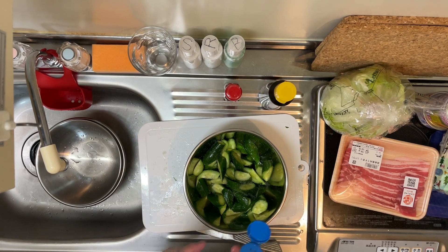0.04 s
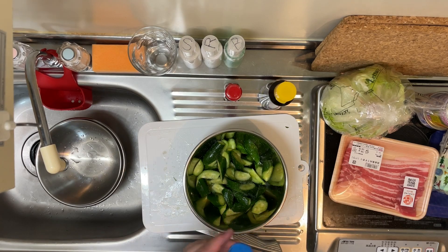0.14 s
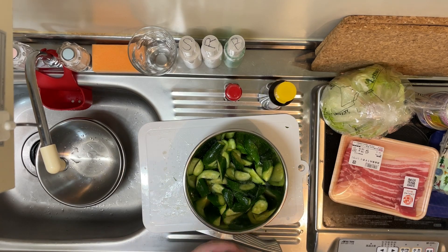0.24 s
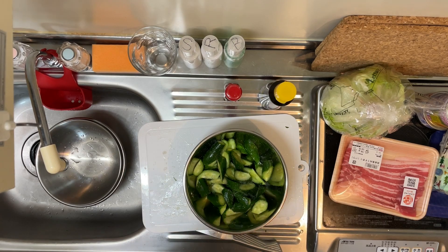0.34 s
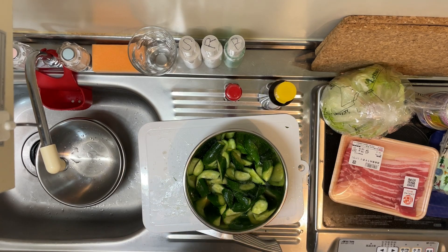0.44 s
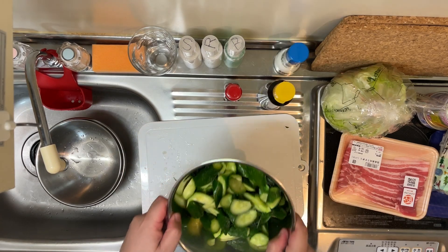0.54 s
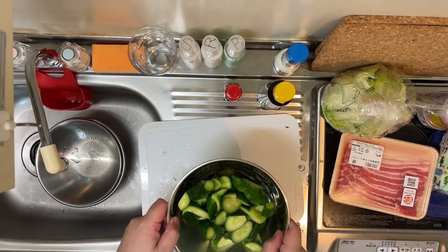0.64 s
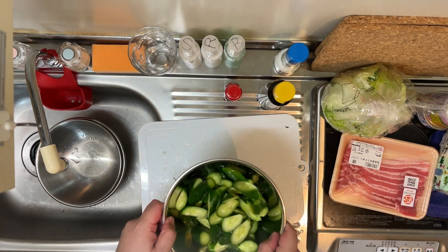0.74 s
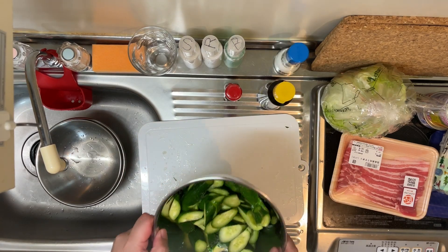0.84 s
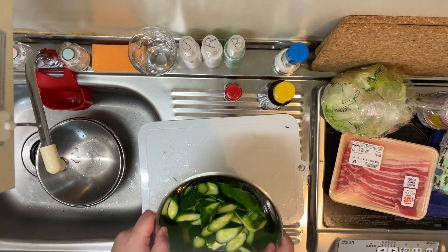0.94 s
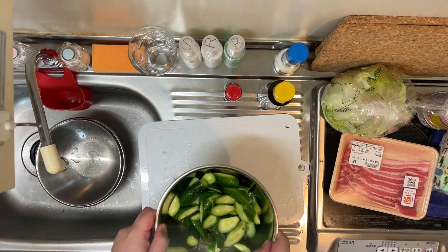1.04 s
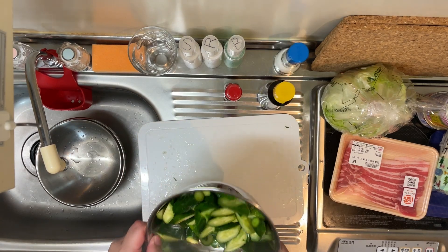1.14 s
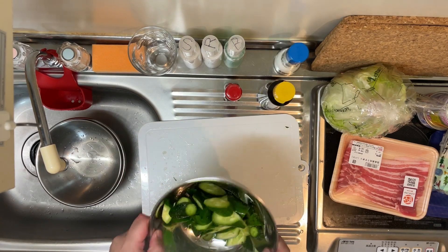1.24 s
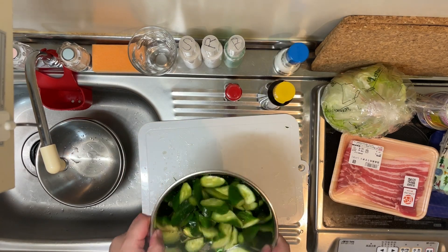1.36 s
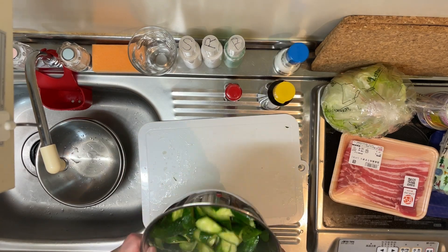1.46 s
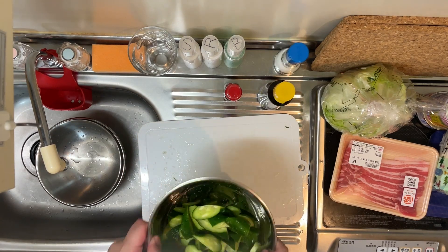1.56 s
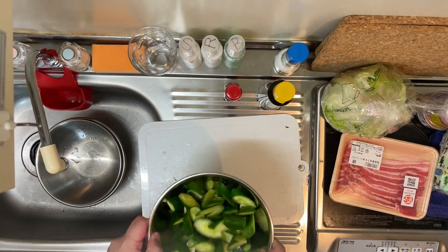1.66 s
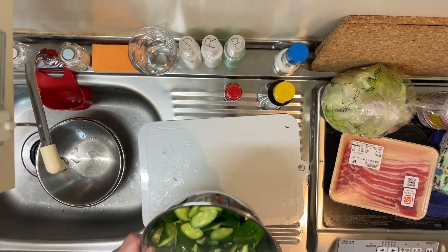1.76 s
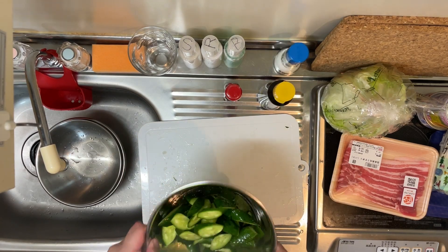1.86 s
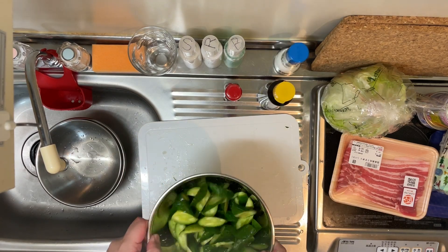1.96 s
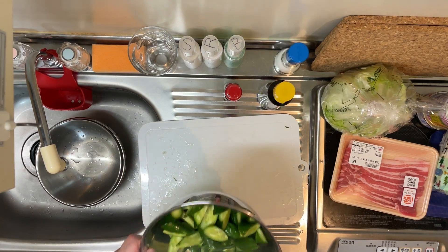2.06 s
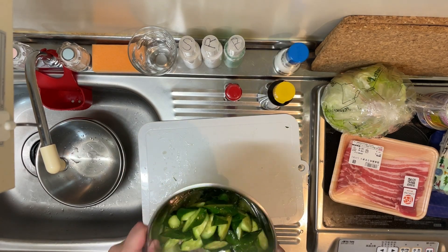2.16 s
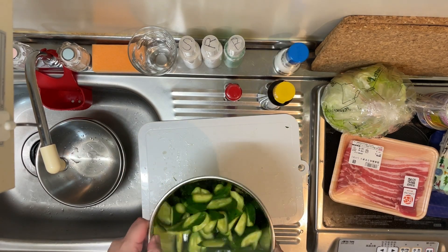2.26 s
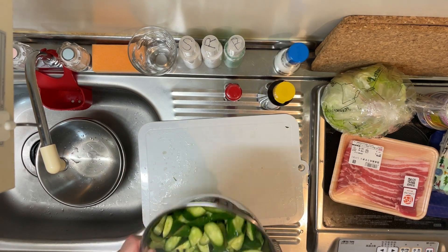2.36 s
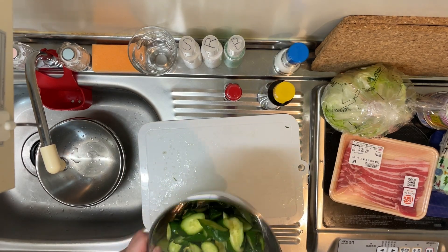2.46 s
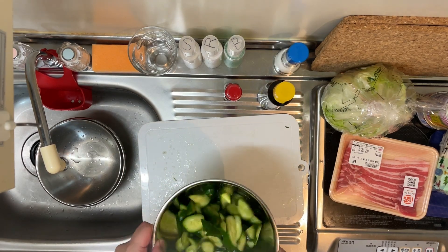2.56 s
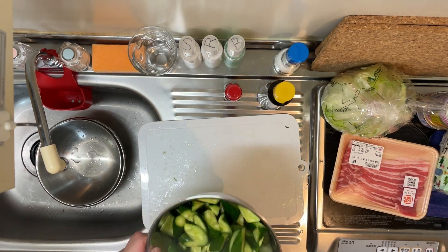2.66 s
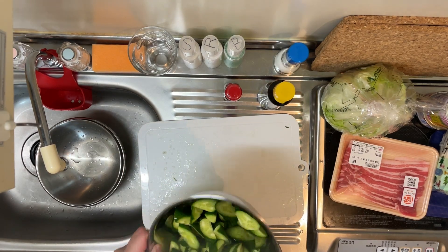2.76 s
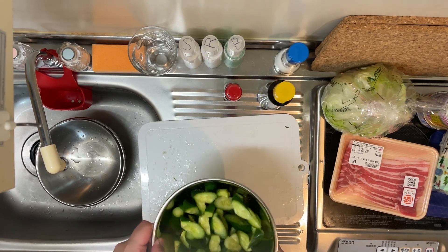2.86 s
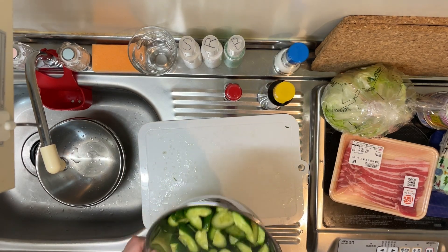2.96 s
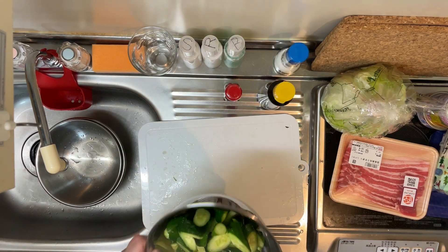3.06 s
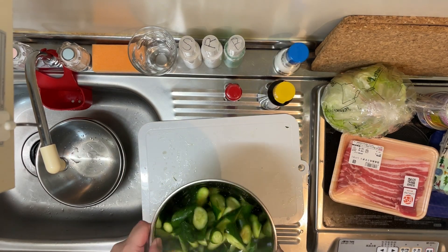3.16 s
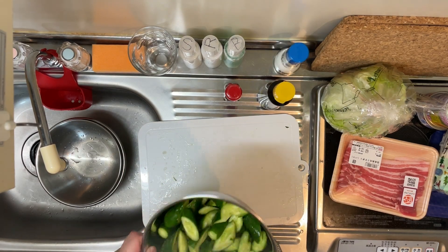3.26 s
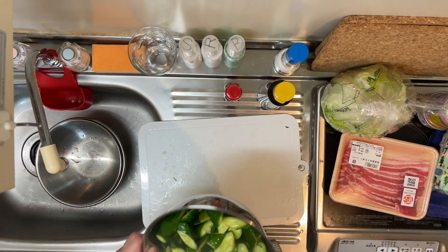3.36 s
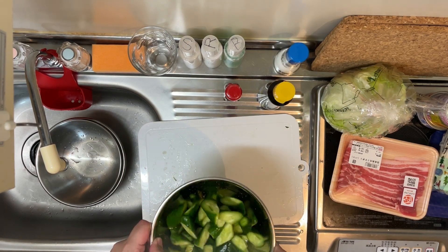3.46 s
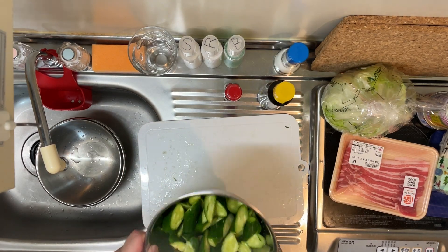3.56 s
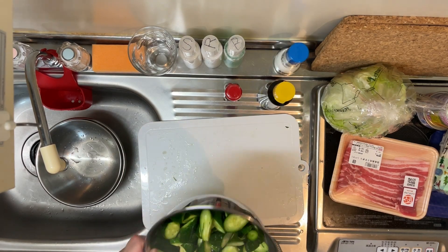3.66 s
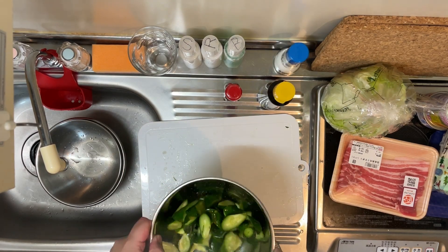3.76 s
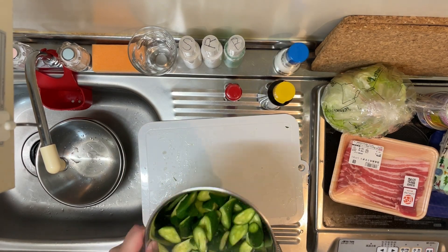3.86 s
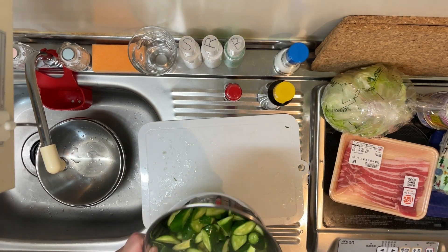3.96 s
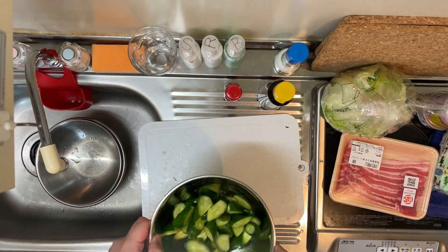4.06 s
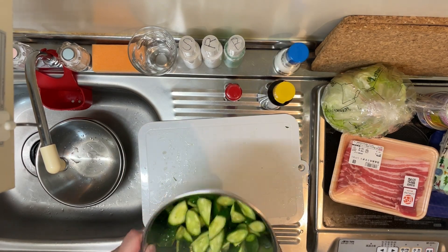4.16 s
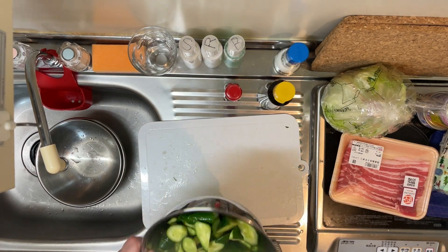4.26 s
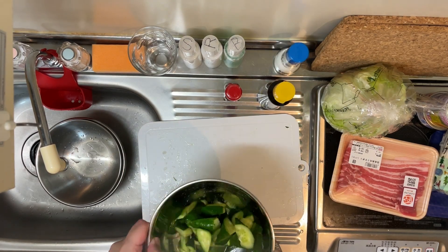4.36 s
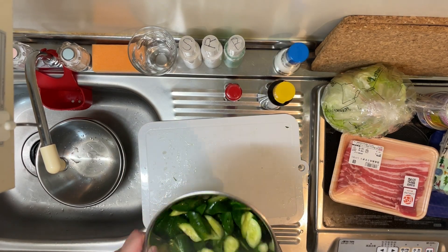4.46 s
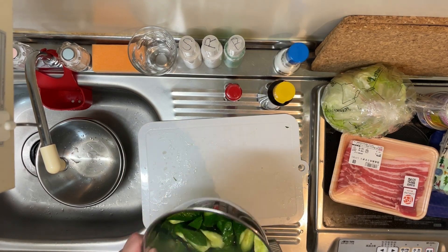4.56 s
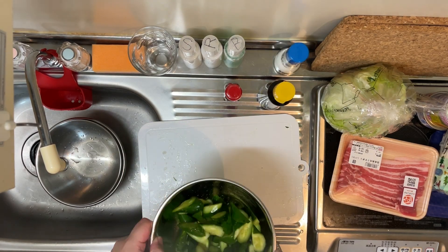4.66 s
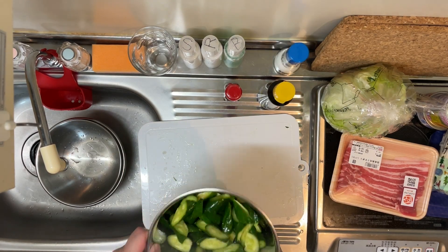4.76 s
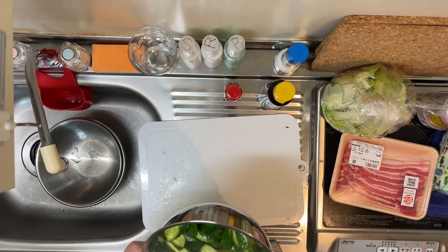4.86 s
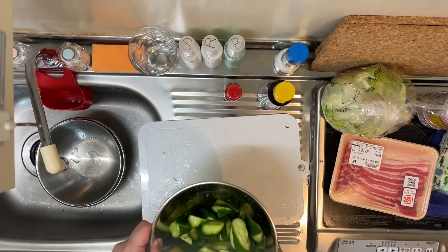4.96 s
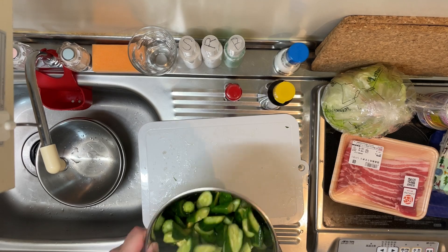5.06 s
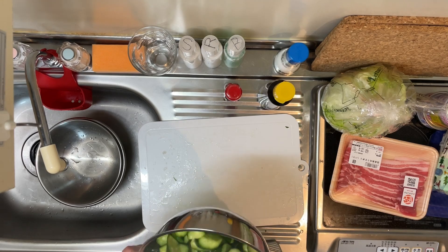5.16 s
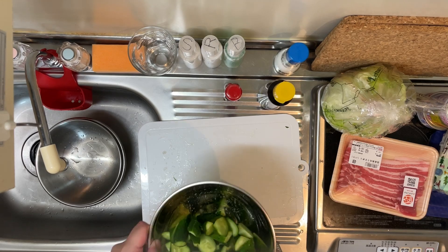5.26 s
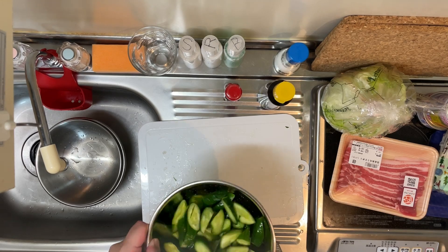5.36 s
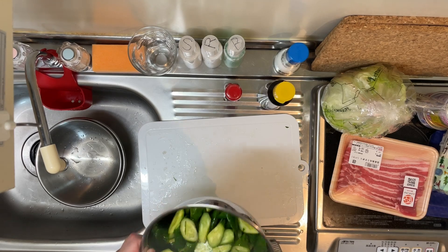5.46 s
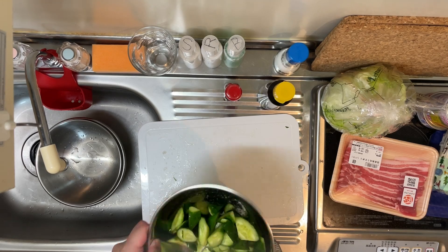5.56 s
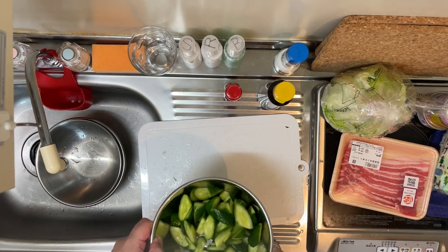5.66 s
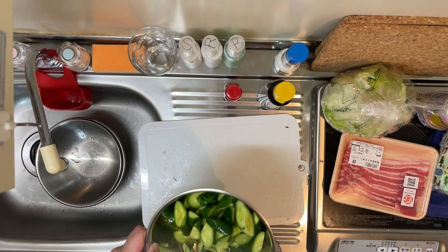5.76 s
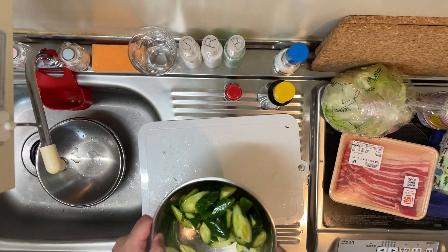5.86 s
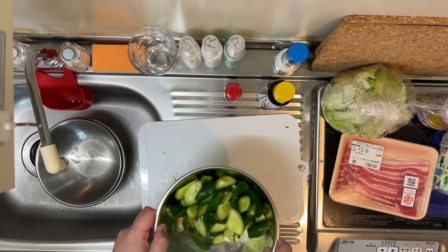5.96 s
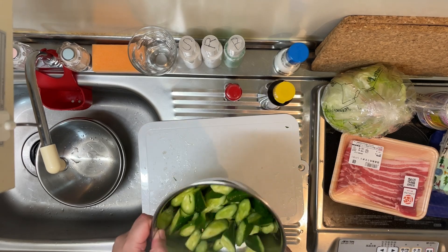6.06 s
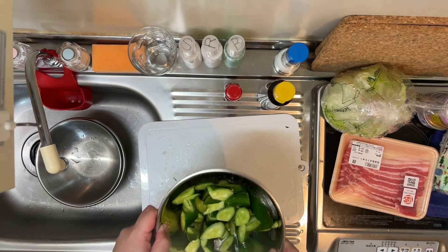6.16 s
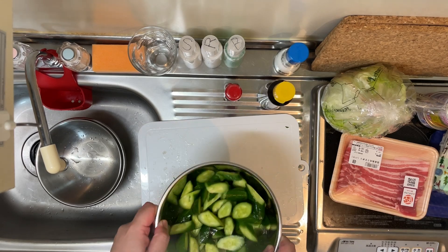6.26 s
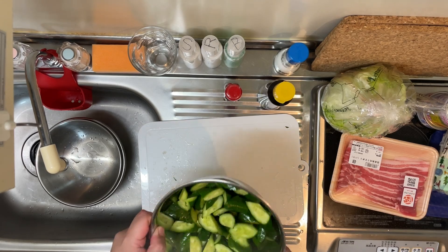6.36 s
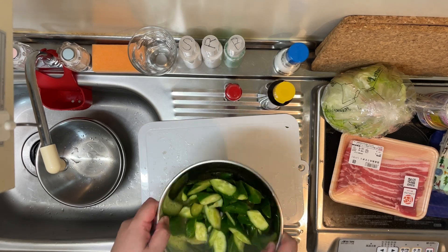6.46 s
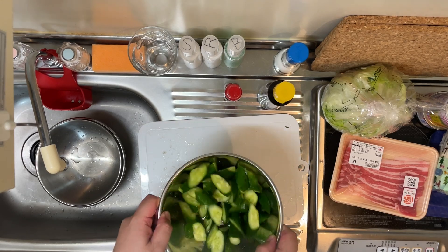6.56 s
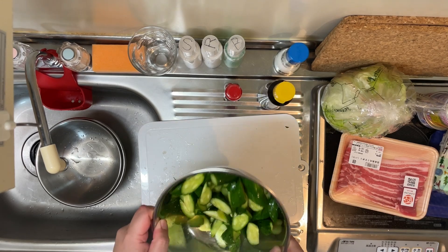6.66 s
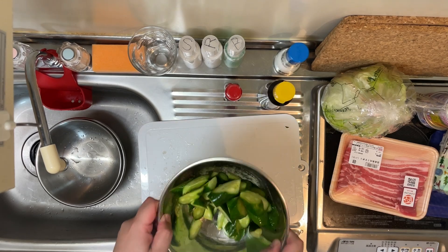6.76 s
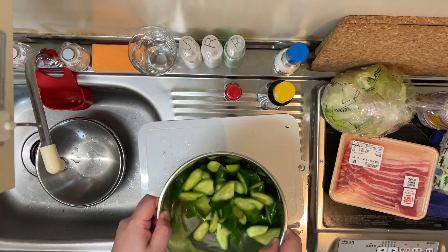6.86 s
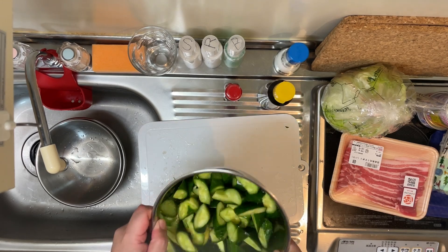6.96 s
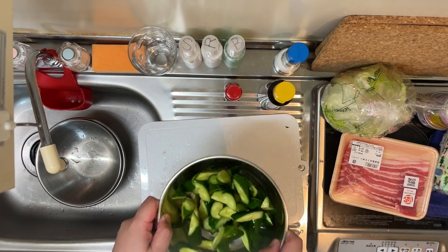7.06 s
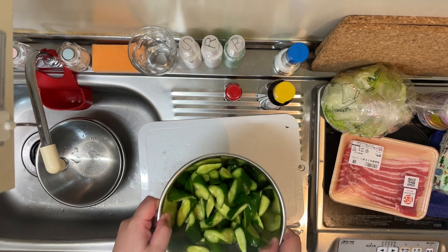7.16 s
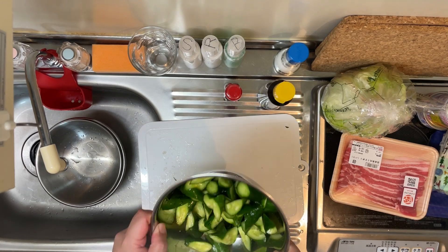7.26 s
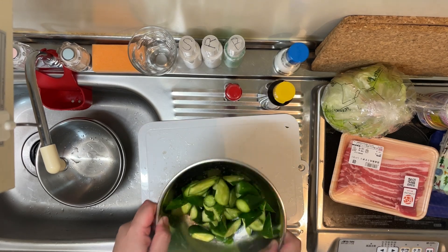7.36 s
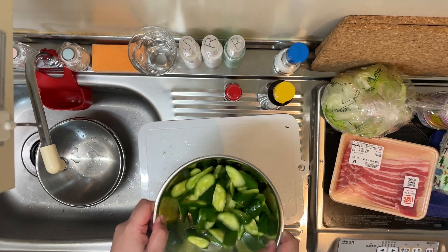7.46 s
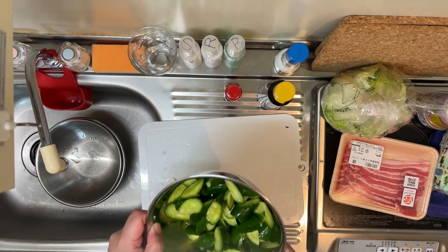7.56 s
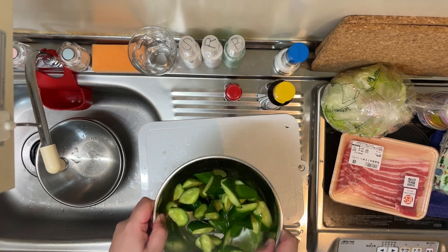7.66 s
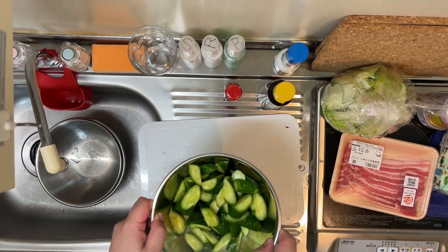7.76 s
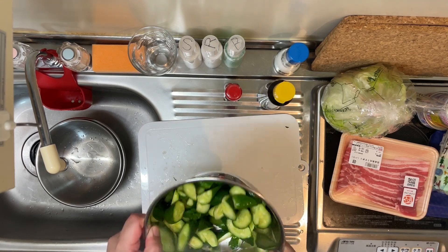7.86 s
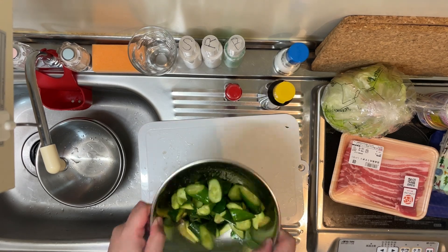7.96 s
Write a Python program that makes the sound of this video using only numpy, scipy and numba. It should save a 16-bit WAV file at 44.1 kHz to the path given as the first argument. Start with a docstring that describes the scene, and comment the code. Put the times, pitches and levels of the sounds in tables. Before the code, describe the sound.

A bottle is set down on a steel counter, then wet cut vegetables are tossed rapidly in a metal bowl over a low fan hum.

```python
"""A fan hums throughout, as shaped noise plus one narrow resonance; stray drops tick as faint noise puffs.
A sleeve rustles (treble noise), then a bottle is set on a steel counter: damped modes and a noise crack.
Then wet cut vegetables are tossed in a hand-held steel bowl about three times a second: each toss lands
as a cluster of dull knocks (damped modes of hollow, grip and wall) with wet slaps (banded noise puffs).
A small kitchen answers through feedback delays."""
import sys
import numpy as np
from scipy import signal
from scipy.fft import rfft, irfft, next_fast_len
from scipy.io import wavfile
from numba import njit

SR = 44100
rng = np.random.default_rng(int(sys.argv[2]) if len(sys.argv) > 2 else 0)


def decibels_to_gain(level_db):
    """Convert a level in decibels to a linear amplitude gain (20 dB per decade)."""
    exponent = np.asarray(level_db, float) / 20
    return 10 ** exponent


def transcribe(signal):
    """Save signal, clipped to [-1, 1], as a 16-bit WAV file at the path in sys.argv[1]."""
    frames = np.atleast_2d(signal).T
    limited = np.clip(frames, -1, 1)
    pcm = np.round(limited * 32767).astype(np.int16)
    wavfile.write(sys.argv[1], SR, pcm)


N = 353241

# fan noise spectrum: f/Hz, relative density/dB per Hz
FAN_SPECTRUM = [(30, -29), (74, 0.5), (240, -2.5), (295, 1), (400, -11), (1790, -19.5), (2900, -28.5),
                (3250, -25.5), (4870, -42.5), (16000, -52.5)]
# sleeve brushing past: t/s, level/dB
RUSTLE_LEVEL = [(0.0, -78), (0.058, -56.5), (0.3, -100)]
# bottle on the counter, heel then flat: t/s, thud level/dB, crack level/dB
BOTTLE_HITS = [(.313, -15, -34), (0.3386, -43, -17)]
# counter modes: f/Hz, relative level/dB, nominal t60/s
COUNTER_MODES = [(185, -24, 0.092), (312, -4.5, 0.055), (760, -12, 0.02)]
# bottle crack spectrum: f/Hz, relative density/dB per Hz
CRACK_SPECTRUM = [(100, 0), (5770, -13), (7940, -7), (16000, -14.5)]
# tosses coming down: first piece t/s, thickest t/s, hollow pitch f/Hz (used relative to mean), splash level/dB
TOSS_LANDINGS = [(0.708, 0.75, 732, -40.5), (1.029, 1.046, 714, -33.5), (1.337, 1.36, 685, -36),
                 (1.643, 1.675, 689, -33), (1.932, 1.973, 651, -36.5), (2.24, 2.282, 683, -37.5),
                 (2.57, 2.6, 676, -33.5), (2.857, 2.884, 666, -39.5), (3.163, 3.211, 676, -38),
                 (3.475, 3.516, 665, -38), (3.771, 3.818, 672, -36.5), (4.1, 4.125, 671, -34.5),
                 (4.387, 4.428, 599, -35), (4.704, 4.725, 690, -36), (5.019, 5.053, 653, -34),
                 (5.331, 5.381, 645, -36), (5.633, 5.692, 672, -38), (5.929, 5.982, 673, -38),
                 (6.236, 6.278, 675, -37.5), (6.527, 6.579, 690, -39), (6.845, 6.885, 647, -35.5),
                 (7.127, 7.165, 637, -40.5), (7.423, 7.482, 690, -39), (7.733, 7.762, 692, -37.5)]
# heaviest pieces hitting the wall: t/s, hollow knock level/dB, steel ring level/dB
HEAVY_PIECES = [(0.7155, -5.5, -40.5), (0.729, -31, -32.5), (0.7512, -15.5, -54), (1.0289, -14.5, -40),
                (1.0623, -11.5, -41), (1.3293, -18.5, -33.5), (1.636, -21, -41), (1.6843, -12.5, -41),
                (1.9877, -25, -48), (2.0026, -14, -27.5), (2.2783, -20, -32), (2.2949, -23, -29),
                (2.6118, -12, -42), (2.859, -46, -42), (3.169, -22, -43), (3.2013, -24, -37.5),
                (3.4998, -20.5, -33.5), (3.5266, -15, -51), (3.8137, -39, -27), (3.8458, -23, -52),
                (4.4186, -25, -29), (4.7158, -8.5, -23.5), (5.034, -29, -34.5), (5.0509, -25.5, -19),
                (5.3381, -15, -33.5), (5.3592, -14.5, -30), (5.3681, -17.5, -38), (5.633, -25, -47.5),
                (5.6597, -18.5, -35), (5.967, -11.5, -54), (6.0006, -17.5, -38.5), (6.2412, -17, -61),
                (6.2602, -17, -38), (6.2925, -18, -36), (6.3039, -15, -33.5), (6.535, -21.5, -57),
                (6.5634, -17, -32), (6.6045, -16, -41), (6.829, -26.5, -48), (6.848, -34, -40),
                (6.8711, -15.5, -52), (6.8954, -20, -39), (6.937, -23.5, -52), (7.1445, -20.5, -27),
                (7.1718, -13, -38), (7.187, -22, -37.5), (7.443, -24, -33.5), (7.7383, -10.5, -36.5),
                (7.7478, -16, -35.5), (7.775, -13, -32.5)]
# wet faces and drops smacking the steel: t/s, level/dB
WET_SLAPS = [(0.761, -31), (1.0705, -21), (1.924, -24), (2.25, -23.5), (2.5474, -31), (2.6148, -16),
             (3.014, -37), (3.3673, -39.5), (3.514, -25), (3.833, -27), (4.0618, -32.5), (4.1212, -26),
             (4.378, -32), (4.566, -35.5), (5.006, -26), (5.687, -21), (5.78, -25), (5.881, -43),
             (5.921, -43), (6.151, -36), (6.329, -29), (6.869, -22), (6.944, -29), (6.985, -26),
             (7.225, -39), (7.911, -47)]
# soft slips along the lightly loaded bowl: t/s, level/dB
SOFT_SLIPS = [(.702, -24), (1.008, -24), (4.98, -28), (5.9, -30), (6.18, -35.5), (6.478, -27), (7.107, -29)]
# edges that catch one wall mode: t/s, mode f/Hz, level/dB
EDGE_CLANKS = [(.7205, 2324, -24), (.7512, 2250, -21.5), (1.361, 3150, -21), (5.0524, 3167, -28)]
# loaded bowl, hollow part that a soft push moves: nominal f/Hz, relative level/dB, nominal t60/s
HOLLOW_MODES = [(501, -6.5, 0.1), (581, 2.5, 0.038), (657.6, 5, 0.053), (705.8, 9, 0.037), (763, 8, 0.0071),
                (900, -12, 0.18), (1125, -6, 0.025)]
# bowl rocking in the hands: nominal f/Hz, relative level/dB, nominal t60/s
GRIP_MODES = [(184, -9, 0.084), (257.5, -1.5, 0.059), (299.7, -6, 0.079)]
# steel wall, rung by hard edges: nominal f/Hz, relative level/dB, nominal t60/s
STEEL_MODES = [(1488, -4, 0.027), (2379, 4.5, 0.019), (3150, 7.5, 0.043), (3947, 11.5, 0.0085),
               (4450, -5.5, 0.034), (5536, -6.5, 0.042), (7090, -7, 0.063)]
# wet noise spectrum: f/Hz, relative density/dB per Hz
SPLASH_SPECTRUM = [(1500, 2), (5500, -6.5), (8900, -3.5), (11000, -11)]

FAN_DB = -43.5
HUM_HZ, HUM_WIDTH_HZ, HUM_DB = 290.5, 22, -53.5   # fan housing
STRAY_DB, STRAY_GROWS_DB_PER_S = -75, 1.16
SLIDE_DB, SLIDE_GROWS_DB_PER_S = -48, 0.38
PING_DB, PING_FOLLOWS = -33.5, 0.43   # wall ring under a slap; share of slap level/dB
TUMBLE_DB, TUMBLE_FOLLOWS = -22.5, 0.36   # dull stream: mean; share of the splash's swing
TUMBLE_GROWS_DB_PER_S = 0.5
GRIP_DB, GRIP_FOLLOWS = -23, 0.38   # hands give: rocking follows the knock only in part
LOADED_RING = 0.4   # share of ring time left while a heavy piece rests on the wall
ROOM_T60_S, ROOM_DB, WALL_CUT_HZ = 0.2, -17, 2550
CUTOFF_HZ = 16100


def rms_one(x):
    """Scale to rms 1."""
    return x / np.sqrt(np.mean(x ** 2) + 1e-20)


def rms_one_gain(response):
    """Scale to mean power gain 1."""
    return response / np.sqrt(np.mean(np.abs(response) ** 2))


def colour(x, spectrum):
    """Minimum-phase filter with this spectrum, power gain 1: nothing sounds early."""
    size = next_fast_len(N + 8192)
    hz = np.maximum(np.arange(size // 2 + 1) * SR / size, 10)
    point_hz, point_db = np.transpose(spectrum)
    gain = decibels_to_gain(np.interp(np.log(hz), np.log(point_hz), point_db))
    # folded cepstrum gives minimum phase
    cepstrum = irfft(np.log(gain), size)
    cepstrum[1:size // 2] *= 2
    cepstrum[size // 2 + 1:] = 0
    response = rms_one_gain(np.exp(rfft(cepstrum)))
    return irfft(rfft(x, size) * response, size)[:N]


def spikes(times, sizes):
    """One-sample clicks at these times, on a negligible floor."""
    out = np.full(N, 1e-18)
    np.add.at(out, (np.asarray(times) * SR).astype(int), sizes)
    return out


def fade(x, t60):
    """Each spike leaves an exponential tail."""
    return signal.lfilter([1], [1, -decibels_to_gain(-60 / (t60 * SR))], x)


@njit
def add_rings(out, at, size, turn, keep, swell):
    """Damped sines (turn/rad, decay factor keep, both per sample); each swells while the contact lasts."""
    for i in range(len(at)):
        z, step, missing = size[i] + 0j, keep[i] * np.exp(1j * turn[i]), 1.0
        for n in range(at[i], min(len(out), at[i] + 6000)):
            z *= step
            missing *= swell
            out[n] += z.imag * (1 - missing)
            if z.real ** 2 + z.imag ** 2 < 1e-10:
                break
    return out


def strike(modes, times, level_db, spread_db, detune, contact_s, tuning=1, ring=1):
    """Each blow drives every mode with its own strength, detuning and damping."""
    hz, mode_db, t60_s = np.transpose(modes)
    draw = rng.standard_normal((len(times), 4, len(modes)))
    sign = np.sign(draw[:, 1] + 1.1)   # a minority start inverted
    size = decibels_to_gain(level_db[:, None] + mode_db + spread_db * draw[:, 0]) * sign
    turn = 2 * np.pi * hz * (np.reshape(tuning, (-1, 1)) + detune * draw[:, 2]) / SR
    ring_s = ring * t60_s * np.exp(0.68 * np.clip(draw[:, 3], -2, 1))
    keep = decibels_to_gain(-60 / (ring_s * SR))
    at = np.repeat((times * SR).astype(np.int64), len(modes))
    swell = np.exp(-1 / (contact_s * SR))
    return add_rings(np.zeros(N), at, size.ravel(), turn.ravel(), keep.ravel(), swell)


def toss_db(peak_db, edge_db, last_s, lead_s, tail_s):
    """Landing stream level: pieces slide in, thicken, thin out until last_s later and settle."""
    out, t = np.full(N, -120.), np.arange(N) / SR
    for (first, thickest, *_), top_db in zip(TOSS_LANDINGS, peak_db):
        thin = thickest + last_s
        corners = [first - lead_s, first, thickest, thin, thin + tail_s]
        out = np.maximum(out, top_db + np.interp(t, corners, [-60, edge_db, 0, edge_db, -60]))
    return out


def splash_db():
    """Level of the wet, bright part of each toss."""
    peak_db = np.transpose(TOSS_LANDINGS)[3]
    return toss_db(peak_db, edge_db=-12, last_s=0.045, lead_s=0.04, tail_s=0.15)


def tumble_db():
    """Level of the dull part of each toss: follows the splash in part and grows slowly."""
    s, _, _, wet_db = np.transpose(TOSS_LANDINGS)
    peak_db = TUMBLE_DB + TUMBLE_FOLLOWS * (wet_db - wet_db.mean())
    peak_db = peak_db + TUMBLE_GROWS_DB_PER_S * (s - s.mean())
    return toss_db(peak_db, edge_db=-8.5, last_s=0.027, lead_s=0.054, tail_s=0.18)


def load_tuning(times):
    """How the load lies in the nearest toss scales all hollow modes alike."""
    thickest, hollow_hz = np.transpose(TOSS_LANDINGS)[1:3]
    nearest = np.abs(times[:, None] - thickest).argmin(axis=1)
    return hollow_hz[nearest] / hollow_hz.mean()


def small_pieces(level_db, per_s, size_db):
    """Times and levels of lighter pieces, falling at random."""
    at = np.flatnonzero((rng.random(N) < per_s / SR) & (level_db > -88))
    return at / SR, level_db[at] + size_db * np.minimum(rng.exponential(1, N)[at], 2.5)


def fan():
    """Steady noise with the fan's spectrum."""
    return decibels_to_gain(FAN_DB) * rms_one(colour(rng.standard_normal(N), FAN_SPECTRUM))


def hum():
    """Noise twice through one narrow resonance of the fan housing."""
    b, a = signal.iirpeak(HUM_HZ, HUM_HZ / HUM_WIDTH_HZ, fs=SR)
    once = signal.lfilter(b, a, rng.standard_normal(N))
    return decibels_to_gain(HUM_DB) * rms_one(signal.lfilter(b, a, once))


def wet():
    """Noise puffs: dull under heavy pieces, thin for stray drops; spray sounds in a few bands only."""
    knock_s, _, ring_db = np.transpose(HEAVY_PIECES)
    slap_s, slap_db = np.transpose(WET_SLAPS)
    spray_s, spray_db = small_pieces(splash_db() - 2.5, per_s=1200, size_db=5)
    stray_level_db = STRAY_DB + STRAY_GROWS_DB_PER_S * np.arange(N) / SR
    stray_s, stray_db = small_pieces(stray_level_db, per_s=180, size_db=6.0)
    s = np.r_[knock_s, slap_s, spray_s, stray_s]
    level_db = np.r_[ring_db, slap_db, spray_db, stray_db]
    # dB per octave below the treble; faint slaps are thinner
    slap_bass_db = 0.5 * np.minimum(slap_db + 31, 0)
    bass_db = np.r_[4.0 + 0 * ring_db, slap_bass_db, -1.5 + 0 * spray_db, -3.0 + 0 * stray_db]
    heavy = np.arange(len(s)) < len(knock_s) + len(slap_s)
    edges_hz = 60 * np.arange(2, 18) ** 2
    uneven = rng.random((len(s), len(edges_hz)))
    out = 0
    for k, (low, high) in enumerate(zip(edges_hz, edges_hz[1:])):
        tilt_db = bass_db * np.clip(np.log2(6500 / low), -0.4, 2.5)
        sounds = heavy | (uneven[:, k] < 0.22)
        puffs = spikes(s, decibels_to_gain(level_db + tilt_db - 20.0 * uneven[:, k]) * sounds)
        noise = fade(puffs, t60=0.043) * rng.standard_normal(N)
        band = signal.butter(2, [low, high], "band", fs=SR, output="sos")
        out = out + signal.sosfilt(band, noise)
    return colour(out, SPLASH_SPECTRUM)


def rustle():
    """Faint treble noise of the sleeve."""
    s, level_db = np.transpose(RUSTLE_LEVEL)
    treble = signal.butter(4, 6500, "high", fs=SR, output="sos")
    hiss = rms_one(signal.sosfilt(treble, rng.standard_normal(N)))
    return hiss * decibels_to_gain(np.interp(np.arange(N) / SR, s, level_db, right=-120))


def bottle():
    """A thud into the counter modes and a broad crack that dies in two stages."""
    s, thud_db, crack_db = np.transpose(BOTTLE_HITS)
    hits = spikes(s, decibels_to_gain(crack_db))
    decay = fade(hits, t60=0.032) + decibels_to_gain(-15.0) * fade(hits, t60=0.18)
    crack = colour(decay * rng.standard_normal(N), CRACK_SPECTRUM)
    return strike(COUNTER_MODES, s, thud_db, spread_db=2.0, detune=0.012, contact_s=0.0002) + crack


def slide():
    """Around each landing the lightly loaded bowl rings clearer: pieces slip along it, drops ping its wall."""
    peak_db = SLIDE_DB + SLIDE_GROWS_DB_PER_S * np.transpose(TOSS_LANDINGS)[0]
    stream_db = toss_db(peak_db, edge_db=-11.5, last_s=0.032, lead_s=0.65, tail_s=0.73)
    small_s, small_db = small_pieces(stream_db, per_s=110, size_db=6.0)
    slip_s, slip_db = np.transpose(SOFT_SLIPS)
    s, level_db = np.r_[slip_s, small_s], np.r_[slip_db, small_db]
    slips = strike(HOLLOW_MODES[2:4], s, level_db, spread_db=8.5, detune=0.007, contact_s=0.015,
                   tuning=load_tuning(s))
    s, slap_db = np.transpose(WET_SLAPS)
    ping_db = PING_DB + PING_FOLLOWS * slap_db
    return slips + strike(STEEL_MODES[4:], s, ping_db, spread_db=0.5, detune=0.049, contact_s=0.0001)


def bowl():
    """Heavy and light pieces knock the hollow bowl, rock it and ring its wall."""
    s, knock_db, ring_db = np.transpose(HEAVY_PIECES)
    out = strike(HOLLOW_MODES, s, knock_db, spread_db=1.0, detune=0.028, contact_s=0.0016,
                 tuning=load_tuning(s), ring=LOADED_RING)
    rock_db = GRIP_DB + GRIP_FOLLOWS * knock_db
    out += strike(GRIP_MODES, s, rock_db, spread_db=5.5, detune=0.023, contact_s=0.00031)
    out += strike(STEEL_MODES, s, ring_db, spread_db=5.0, detune=0.013, contact_s=0.00063)
    # light pieces, dull part
    s, level_db = small_pieces(tumble_db(), per_s=350, size_db=3.0)
    out += strike(HOLLOW_MODES, s, level_db - 15.5, spread_db=5.5, detune=0.044, contact_s=0.00059,
                  tuning=load_tuning(s), ring=0.75)
    out += strike(GRIP_MODES, s, level_db - 13.0, spread_db=4.0, detune=0.081, contact_s=0.00043)
    # light pieces, bright part
    s, level_db = small_pieces(splash_db(), per_s=500, size_db=1.5)
    return out + strike(STEEL_MODES, s, level_db - 13.0, spread_db=4.5, detune=0.0277, contact_s=0.000083)


def clanks():
    """A single wall mode, left free to ring."""
    out = np.zeros(N)
    for s, hz, level_db in EDGE_CLANKS:
        mode = [(hz, level_db, 0.06)]
        out += strike(mode, np.array([s]), np.zeros(1), spread_db=7, detune=0, contact_s=0.0006)
    return out


def kitchen(x):
    """Ten feedback delays, duller on every round, summed on a frequency grid."""
    size = next_fast_len(N + SR)
    w = 2 * np.pi * np.arange(size // 2 + 1) / size
    dull = 1 / (1 + 1j * w * SR / (2 * np.pi * WALL_CUT_HZ))
    out = 0
    for k, lag in enumerate(np.geomspace(0.009, 0.034, 10) * SR):
        loop = decibels_to_gain(-60 * lag / SR / ROOM_T60_S) * dull * np.exp(-1j * w * round(lag))
        out = out + (-1) ** k * loop / (1 - loop)
    return irfft(rfft(x, size) * out, size)[:N]


def scene():
    """Close sources, their room echo and the fan; things this small radiate no deep bass."""
    near = wet() + rustle() + bottle() + slide() + bowl() + clanks()
    near = signal.sosfilt(signal.butter(4, 110, "high", fs=SR, output="sos"), near)
    return (near + decibels_to_gain(ROOM_DB) * kitchen(near) + fan() + hum())[None]


def roll_off(x):
    """The treble ends steeply here."""
    return signal.sosfilt(signal.butter(12, 16820, fs=SR, output="sos"), x)


def record(dry):
    """Peaks are rounded, then the top is cut."""
    rounded = 0.56 * np.tanh(dry / 0.56)
    low_pass = signal.cheby2(12, 35, CUTOFF_HZ, fs=SR, output="sos")
    mix = signal.sosfilt(low_pass, rounded)
    return roll_off(mix)


dry = scene()
out = record(dry)
transcribe(out)
```